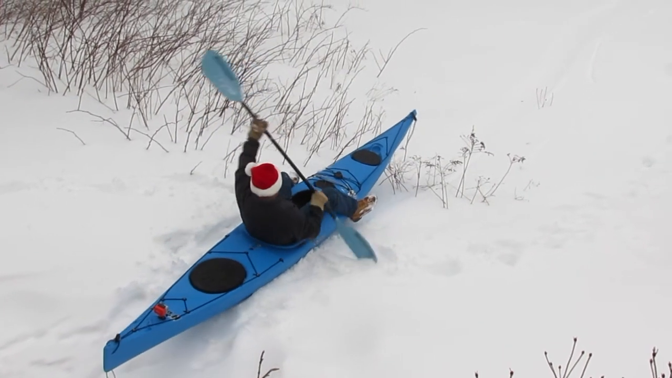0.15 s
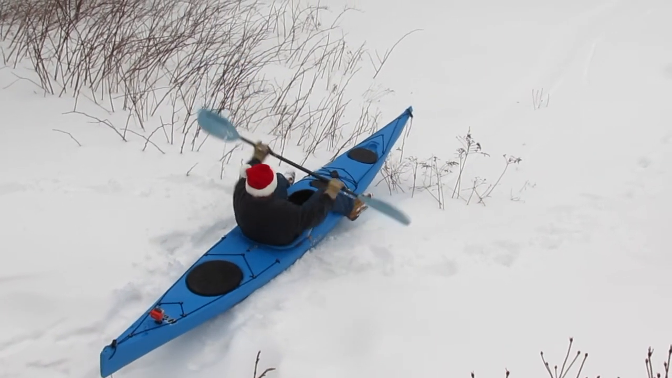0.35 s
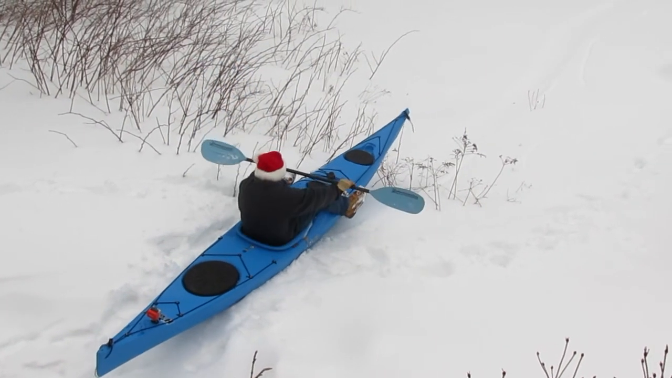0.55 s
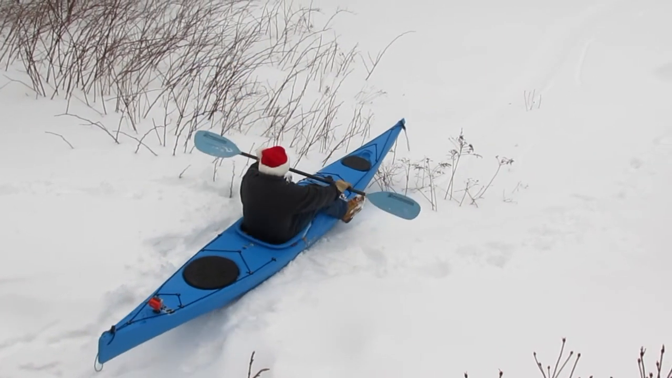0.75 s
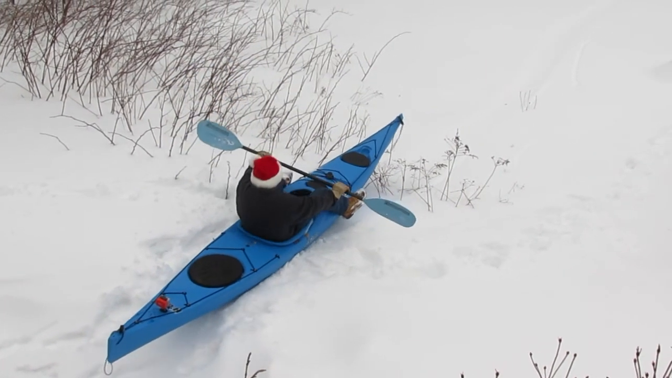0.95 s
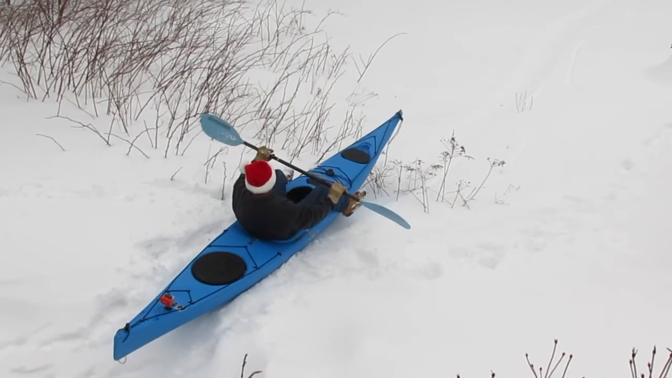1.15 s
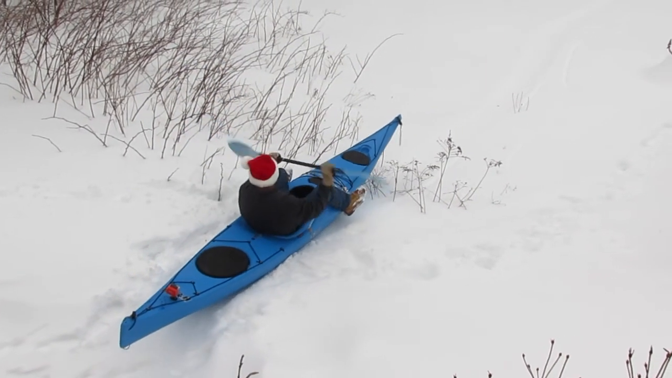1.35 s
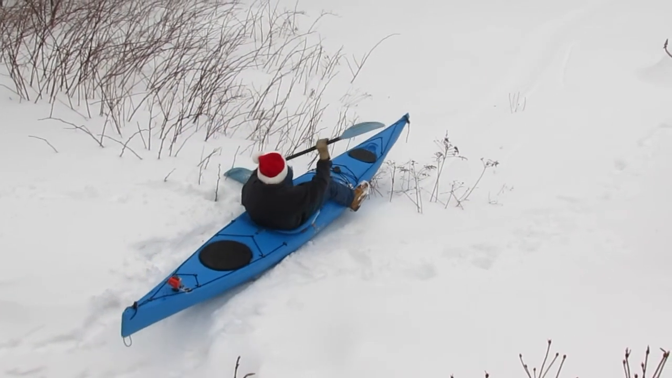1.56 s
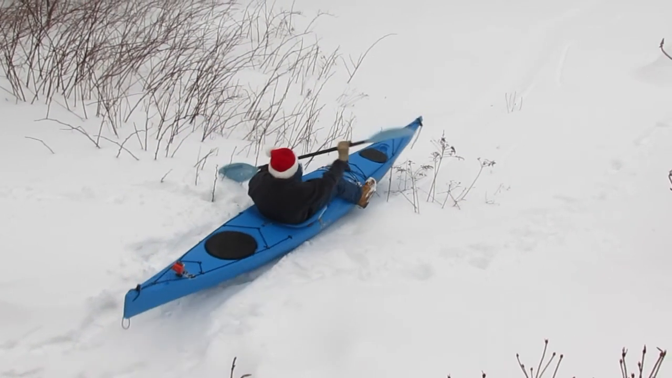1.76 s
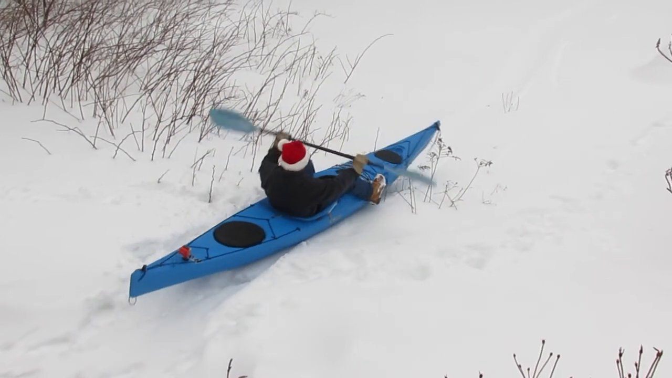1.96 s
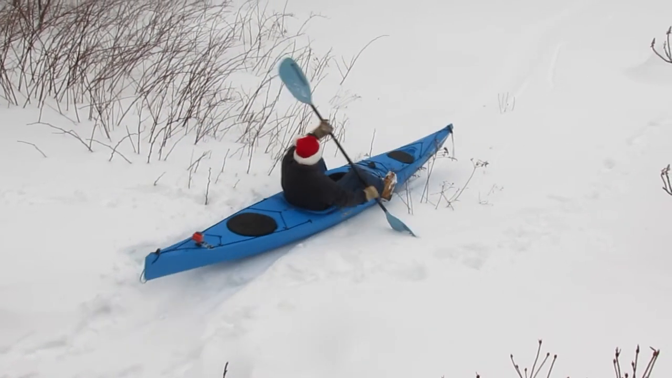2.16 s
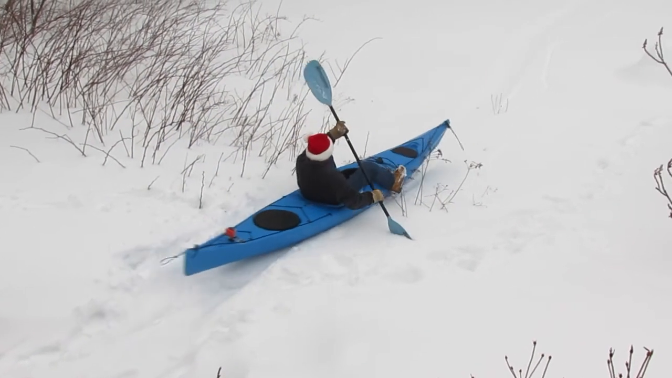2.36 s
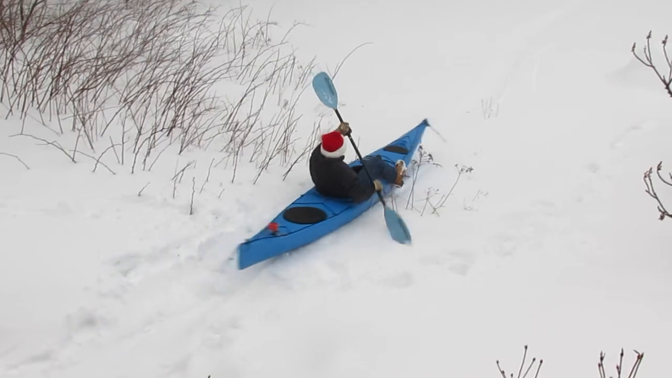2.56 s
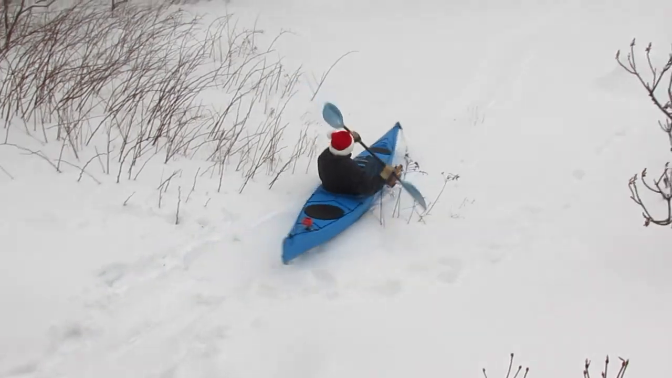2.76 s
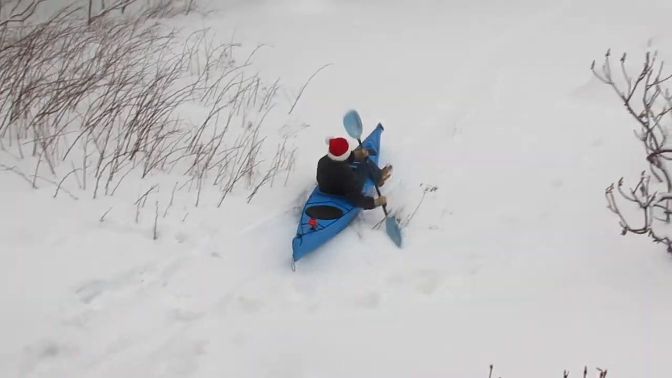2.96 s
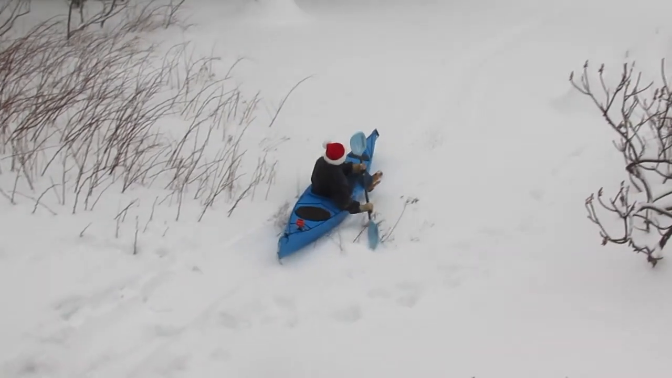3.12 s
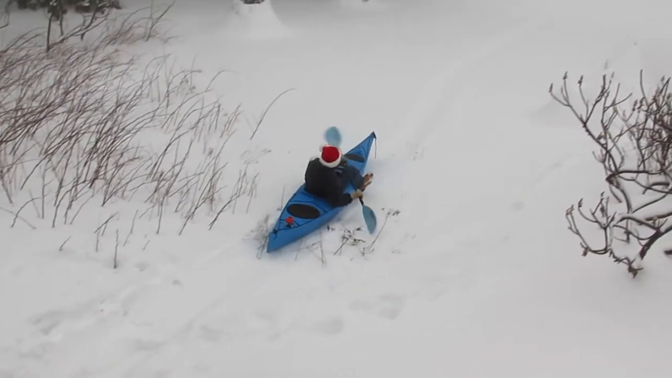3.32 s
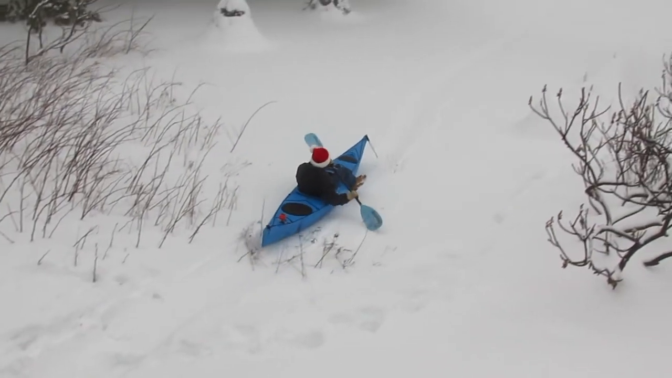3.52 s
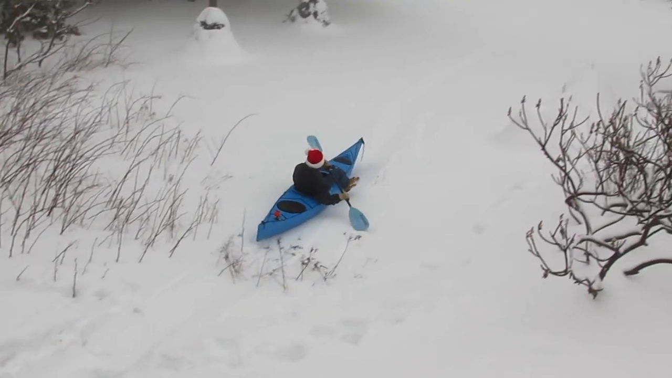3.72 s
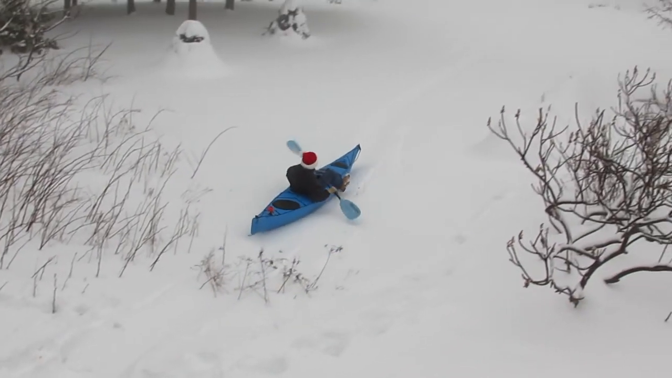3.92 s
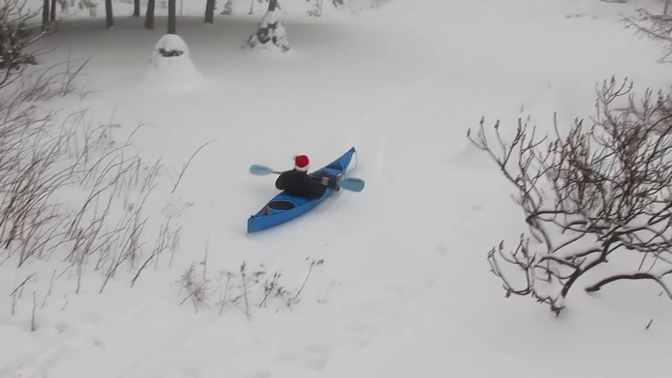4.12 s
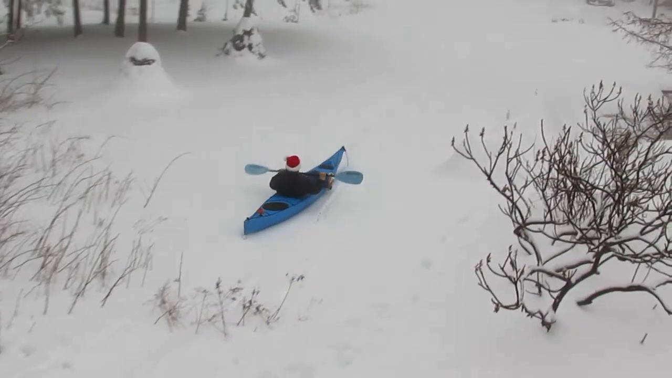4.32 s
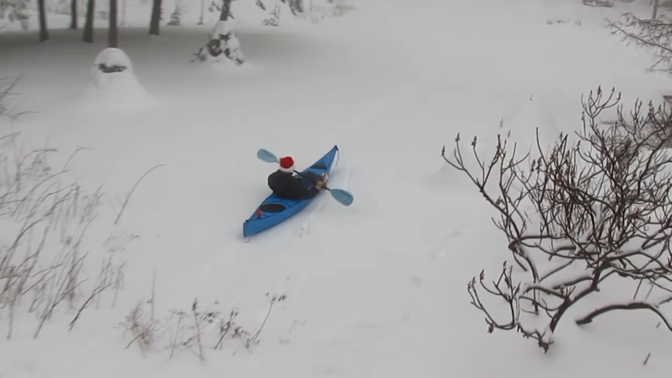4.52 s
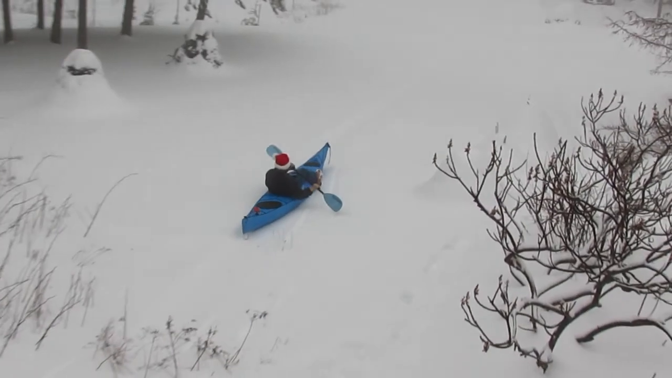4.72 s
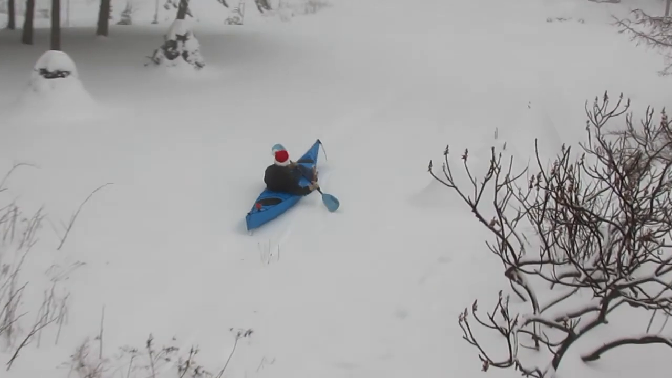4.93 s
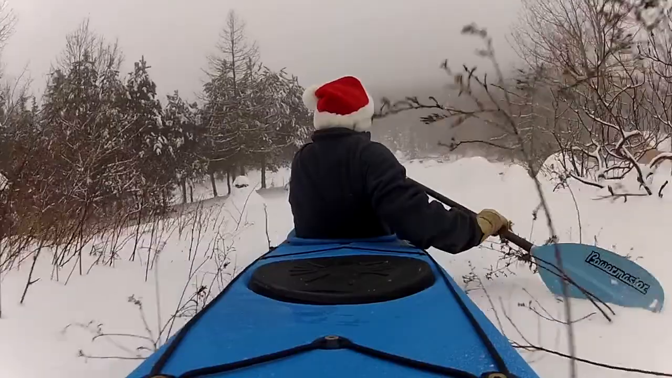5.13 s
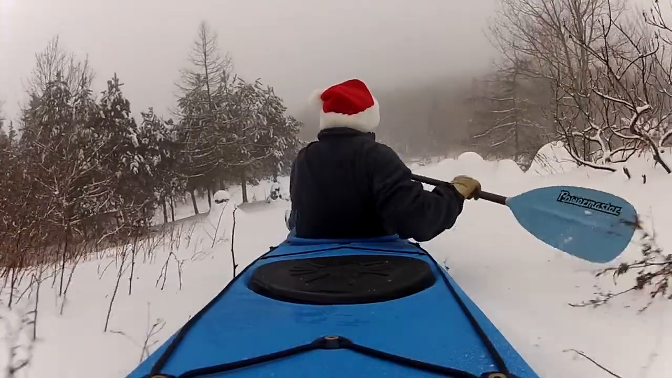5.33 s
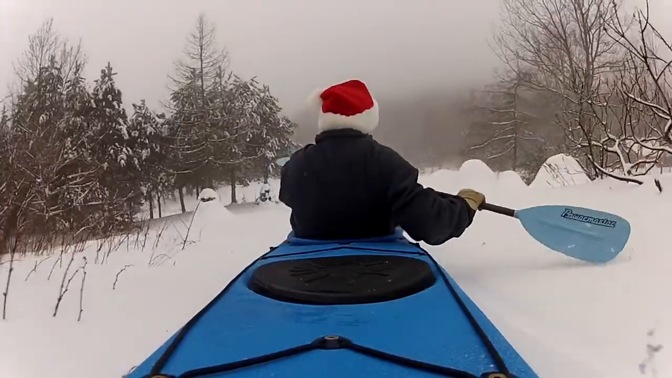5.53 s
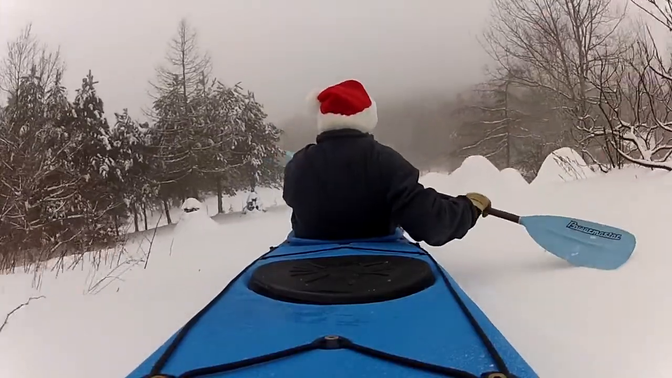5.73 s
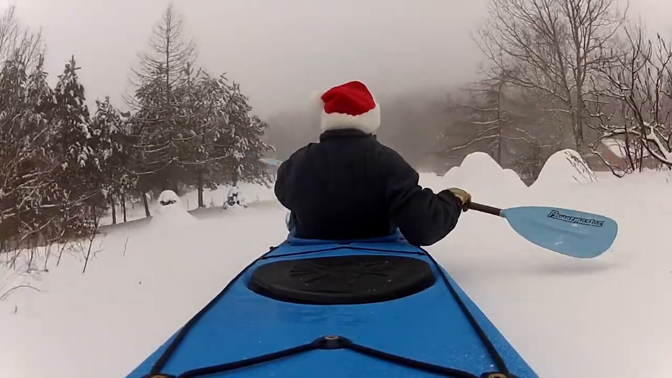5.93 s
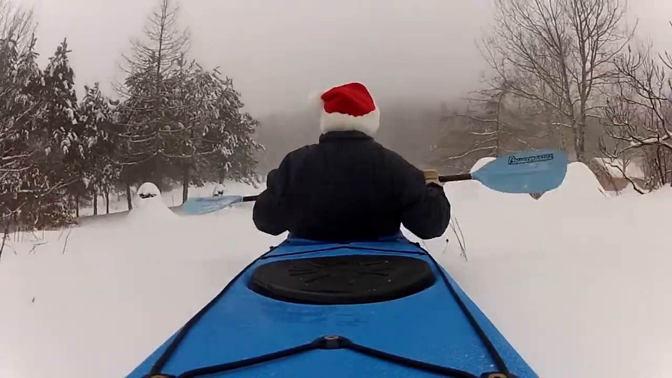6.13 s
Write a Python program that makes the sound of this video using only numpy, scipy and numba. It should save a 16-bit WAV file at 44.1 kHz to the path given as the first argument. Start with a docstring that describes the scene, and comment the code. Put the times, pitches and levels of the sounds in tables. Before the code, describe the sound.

A paddle crunches into crusty snow as a kayak bumps and hisses downhill in gusty wind, switching to close, resonant hull rubbing.

```python
"""A snowy slope, heard from a hand-held camera uphill: a plastic kayak is pushed off and slides down.
The hull hisses over snow crystals and thumps on bumps, the paddle blade crunches and drags in the crust,
gusts buffet the microphone. Then the sound cuts to a small camera fixed on the deck, where the
rubbing rings hull and housing."""
import sys
import numpy as np
from scipy import signal
from scipy.fft import rfft, irfft
from scipy.io import wavfile
from scipy.ndimage import uniform_filter1d
from numba import njit

SR = 44100
rng = np.random.default_rng(int(sys.argv[2]) if len(sys.argv) > 2 else 0)


def master_out(mix):
    """Clip the mix to full scale and print it as 16-bit PCM to the path in sys.argv[1]."""
    frames = np.transpose(np.atleast_2d(mix))
    ceiling = np.clip(frames, -1, 1)
    pcm = np.round(ceiling * 32767).astype(np.int16)
    wavfile.write(sys.argv[1], SR, pcm)


N = 272538
T = np.arange(N) / SR


def undb(db):
    return 10 ** (np.asarray(db) / 20)


def unit(x):
    return x / np.sqrt(np.mean(x ** 2))


def columns(table):
    """Each column after time, interpolated per sample."""
    times_s, *cols = np.transpose(table)
    return [np.interp(T, times_s, col) for col in cols]


def colour(x, points, db_scale=1):
    """Zero-phase filter through (frequency [Hz], gain [dB]) points."""
    hz, db = np.transpose(points)
    bins_hz = np.arange(N // 2 + 1) * SR / N + 1
    gain_db = db_scale * np.interp(np.log(bins_hz), np.log(hz), db)
    return irfft(rfft(x) * undb(gain_db), N)


@njit
def svf(x, hz, width_hz):
    """State-variable band-pass, unity gain at its moving centre."""
    y = np.empty(len(x))
    band_state, low_state = 0., 0.
    for i in range(len(x)):
        g = np.tan(np.pi * hz[i] / SR)
        damping = width_hz[i] / hz[i]
        v = (band_state + g * (x[i] - low_state)) / (1 + g * (g + damping))
        band_state = 2 * v - band_state
        low_state += 2 * g * v
        y[i] = damping * v
    return y


def band(x, hz, *widths_hz):
    """Band-passes in series, one per width."""
    for width_hz in widths_hz:
        x = svf(x, hz + np.zeros(N), width_hz + np.zeros(N))
    return x


def walk(rate_hz):
    """Random steps, smoothed twice; RMS 1."""
    hold = max(int(SR / rate_hz), 1)
    steps = np.repeat(rng.standard_normal(N // hold + 1), hold)
    return unit(uniform_filter1d(uniform_filter1d(steps, hold), hold)[:N])


def grains(rate_hz, spread_db):
    """Snow crystals breaking: noise whose level jumps in short bursts."""
    return unit(rng.standard_normal(N) * undb(spread_db * walk(rate_hz)))


def ring(x, modes):
    """Damped modes: (frequency [Hz], level [dB], t60 [s])."""
    return sum(undb(db) * unit(band(x, hz, np.log(1000) / np.pi / t60_s)) for hz, db, t60_s in modes)


def stroke_power(start_s, db, rise_s, hold_s, t60_s):
    """Power envelope of one stroke: rise, hold, decay."""
    t = T - start_s
    decay_db = 60 * np.maximum(t - rise_s - hold_s, 0) / t60_s
    return (undb(db - decay_db) * np.clip(t / rise_s, 0, 1)) ** 2


def air():
    """Still air: faint, steady, mostly low noise."""
    # (frequency [Hz], gain [dB])
    spectrum = [(15, -40), (25, -6), (249, 3), (384, -4.5), (677, -8), (2990, -18), (9840, -24),
                (13200, -26), (16000, -31)]
    return unit(colour(rng.standard_normal(N), spectrum)) * undb(-50)


def wind(level_db):
    """Gusts buffeting the microphone ports."""
    buffet = unit(band(rng.standard_normal(N), 64, 31, 60))
    return buffet * undb(level_db + 2.7 * walk(8))


def hull_and_wind():
    """Each bump is a blow, then a rough shove; the riding hull shakes under the gusts."""
    # drops onto bumps: (time [s], relative level [dB])
    bumps = [(0.815, -21.5), (0.848, -21.5), (0.889, -23.5), (1.437, -23), (1.459, -22.5), (1.592, -28),
             (1.703, -22.5), (1.798, -22.5), (1.881, -25), (2.084, -19)]
    # hull modes: (frequency [Hz], relative level [dB], t60 [s])
    modes = [(61, -1.5, 0.1), (92.4, -0.5, 0.13), (192, -6, 0.065), (320, -8, 0.025)]
    # (time [s], hull shake [dB], wind [dB])
    rumble = [(.3, -44.5, -57.5), (.6, -59.5, -58), (1.0, -44, -70), (1.65, -40, -58), (2.3, -42.5, -39),
              (2.95, -37.5, -47), (3.7, -49, -51), (4.1, -46.5, -41), (4.6, -48, -44), (5.2, -43, -63)]
    shake_db, wind_db = columns(rumble)
    force = 0
    for start_s, db in bumps:
        t = np.maximum(T - start_s, 0)
        blow = t / 0.0029 * np.exp(-t / 0.0017)
        shove = 0.16 * np.exp(-t / 0.024) * walk(600)
        force += undb(db) * (T >= start_s) * (blow + shove)
    thumps = unit(ring(force, modes)) * undb(-42.5)
    shake = unit(ring(rng.standard_normal(N), [(hz, db, .06) for hz, db, _ in modes[1:]]))
    return thumps + shake * undb(shake_db + walk(12)) + wind(wind_db)


def shaft_taps():
    """The paddle shaft taps the deck and rings."""
    # (time [s], relative level [dB])
    taps = [(0.595, -32.5), (0.7791, -42)]
    # shaft modes: (frequency [Hz], relative level [dB], t60 [s])
    modes = [(1280, -1, 0.03), (1780, -6, .015), (2180, 2, 0.044), (2480, -2, .012), (3150, -5, .012)]
    blow_t60_s, peak_db = 0.052, -32
    blows = sum(undb(db - 60 * np.abs(T - s) / blow_t60_s) * (T >= s) for s, db in taps)
    ringing = ring(blows * rng.standard_normal(N), modes)
    return ringing * undb(peak_db) / np.abs(ringing).max()


def snap_power():
    """Power envelope of crust lumps snapping: faint ones at random, loud ones at set times."""
    # (time [s], level [dB])
    loud_snaps = [(0.0717, -33), (0.3588, -29), (0.3974, -40), (0.4422, -31), (0.508, -42), (0.5664, -38),
                  (0.614, -40), (0.669, -43), (0.7108, -43), (1.6464, -21), (1.6604, -23), (1.758, -18),
                  (1.777, -21), (1.7946, -22), (1.923, -18)]
    faint_count, t60_s = 140, 0.0096
    onsets = np.zeros(N)
    faint_db = rng.normal(-45.5, 5, faint_count)
    onsets[rng.integers(N, size=faint_count)] = undb(2 * faint_db)
    for start_s, db in loud_snaps:
        onsets[int(start_s * SR)] = undb(2 * db)
    return signal.lfilter([1], [1, -undb(-120 / t60_s / SR)], onsets)


def blade():
    """The blade bites and drags in snapping crust; bites also excite its broad ring."""
    # (time [s], level [dB], hold [s], t60 [s], knock re level [dB])
    bites = [(0, -36.5, .008, .06, -5), (0.201, -30, .003, .03, -5), (0.213, -23.5, .005, .03, -9),
             (0.233, -23, .003, .025, -5), (.256, -24.5, 0.0027, .035, -1.5), (0.278, -37, .003, .03, -7),
             (0.31, -36, .003, .035, -11), (1.581, -19, 0.054, .045, -6), (1.617, -22, 0.0054, .02, -9),
             (1.668, -26.5, .005, .03, -16), (1.828, -25, .004, 0.063, -2.5),
             (2.215, -13, 0.0083, 0.11, -9), (2.626, -24, 0.018, .2, -3), (2.974, -20.5, 0.067, .06, -9),
             (3.274, -21, .005, .03, -12), (3.475, -14.5, 0.027, 0.18, -16), (5.079, -20, 0.04, .35, -9.5)]
    # (time [s], level [dB], rise [s], hold [s], dull part re level [dB])
    drags = [(0.094, -37, .11, .05, 5.5), (1.874, -32.5, .006, .015, 5), (2.26, -36, .04, 0.19, -10),
             (3.08, -21.5, 0.15, .135, 0.5), (3.521, -28, .006, .09, 3.5), (3.681, -24, 0.0066, 0.24, 1)]
    # breaking crust: (frequency [Hz], gain [dB])
    spectrum = [(120, -23), (250, -17), (450, -18), (800, -8.5), (1250, -6), (2300, -9.5), (4500, -5.5),
                (12000, -9.5), (16000, -21.5)]
    split_hz, knock_hz, knock_width_hz = 8600, 1650, 2280
    bright_power = snap_power()
    dull_power = 0.23 * bright_power
    knock_power = 0
    for start_s, db, hold_s, t60_s, knock_db in bites:
        power = stroke_power(start_s, db, rise_s=.002, hold_s=hold_s, t60_s=t60_s)
        bright_power += power
        dull_power += power
        knock_power += power * undb(2 * knock_db)
    for start_s, db, rise_s, hold_s, dull_db in drags:
        power = stroke_power(start_s, db, rise_s, hold_s, t60_s=0.058)
        bright_power += power
        dull_power += power * undb(2 * dull_db)
    crust = unit(colour(grains(700, 2.65) * undb(0.95 * walk(110)), spectrum))
    dull = signal.sosfiltfilt(signal.butter(2, split_hz, fs=SR, output="sos"), crust)
    bright = crust - dull
    knock = unit(band(crust, knock_hz, knock_width_hz, knock_width_hz))
    return dull * np.sqrt(dull_power) + bright * np.sqrt(bright_power) + knock * np.sqrt(knock_power)


def slide():
    """Crystals rub under the hull; the slope's reflection leaves two humps that drift with distance."""
    # paddle swishing through snow, then push-off, gathering speed: (time [s], low hump [dB])
    levels = [(0, -50.5), (.2, -37), (.4, -49.5), (.7, -70), (.79, -53), (.88, -38.5), (.99, -36.5),
              (1.36, -44.5), (1.46, -38.5), (1.67, -40), (1.83, -32.5), (1.9, -34), (2.15, -28.5),
              (2.27, -28.5), (2.36, -24), (2.56, -20), (2.71, -22), (2.94, -21), (3.13, -24), (3.47, -25),
              (3.63, -29.5), (3.7, -24), (3.92, -25.5), (4.03, -23), (4.29, -23), (5.23, -24.5)]
    # spectral humps as the boat turns and draws away:
    # (time [s], low centre [Hz], high re low [dB], high centre [Hz], body re low [dB])
    humps = [(0, 1590, -2.5, 5660, -4), (.8, 1250, -4, 6100, 0), (1.05, 1350, -2.5, 5500, 1),
             (1.36, 1370, 2, 5500, 3), (1.75, 1240, -2.5, 5700, 1), (2.12, 1330, 1.5, 6560, -5),
             (2.4, 1450, -1.5, 6200, -20), (2.95, 1650, 1.5, 5300, -5), (3.5, 1820, 3, 5730, -7),
             (4.1, 1860, 2.5, 5750, -8), (4.75, 2020, 5, 5710, -10), (5.23, 2000, 1, 5700, -8)]
    # packed snow: (frequency [Hz], gain [dB])
    body_spectrum = [(200, -13), (400, -8), (700, 0), (1200, -3), (2500, -8), (4000, -10.5), (7500, -6),
                     (10500, -22), (15000, -58)]
    # fine powder, lost with distance: (time [s], level re low hump [dB])
    spray_levels = [(.8, -10.5), (1.5, -6), (2.3, -10.5), (3.2, -16), (4, -37), (5.2, -34)]
    low_db, = columns(levels)
    spray_db, = columns(spray_levels)
    low_hz, high_db, high_hz, body_db = columns(humps)
    low = unit(band(grains(400, 0.79), low_hz, 0.72 * low_hz, 2.5 * low_hz))
    high = unit(band(grains(400, 0.52), high_hz, 0.58 * high_hz, 0.64 * high_hz)) * undb(high_db)
    body = unit(colour(grains(300, 0.77), body_spectrum)) * undb(body_db)
    spray = unit(band(grains(450, 2.0), 8300, 5200)) * undb(spray_db)
    low *= undb(.5 * walk(30.93))  # uneven snow
    high *= undb(.5 * walk(20))
    return undb(low_db) * (low + high + body + spray)


def slope_sources():
    """Kayak, paddle and gusts; fresh noise on each call."""
    return slide() + blade() + shaft_taps() + hull_and_wind()


def handheld():
    """Two close ports share the direct sound; scatter off snow and bushes arrives in opposite phase."""
    # scattered re direct: (frequency [Hz], gain [dB])
    scatter = [(60, -17), (400, -9.5), (1400, -13.5), (3000, -7.5), (6500, -18), (15000, -6)]
    # port imbalance: (frequency [Hz], left minus right [dB])
    ports = [(60, -7), (250, -3.5), (700, -2.5), (1500, -.5), (4500, .5), (9000, -.5), (15000, -2.5)]
    # response: (frequency [Hz], gain [dB])
    microphone = [(20, -24), (45, -16.5), (90, -3.5), (150, 1), (2500, 0.5), (3000, -2.5), (3900, 1),
                  (5000, -0.5)]
    direct = slope_sources()
    scattered = colour(slope_sources(), scatter)
    sides = []
    for sign in (1, -1):
        at_port = colour(direct + sign * scattered + air(), ports, db_scale=sign / 2)
        sides.append(colour(at_port, microphone))
    return np.tanh(0.79 * np.array(sides)) / 0.8  # soft clip


def deck():
    """Rubbing carried through the plastic rings deck and housing; mono, sampled at 12 kHz."""
    # (time [s], rubbing [dB])
    rub_levels = [(5.24, -18), (5.42, -14.5), (5.486, -17.5), (5.53, -13.5), (5.75, -17.5), (5.95, -14.5),
                  (5.982, -16), (6.012, -14.5), (6.18, -15.5)]
    # (time [s], hum [dB], thudding [dB])
    low_levels = [(5.24, -37, -32), (5.32, -34, -33.5), (5.4, -37, -28), (5.47, -41, -34), (5.54, -35, -23),
                  (5.7, -28, -35), (5.78, -30.5, -29), (5.88, -28, -36.5), (5.95, -34, -38),
                  (6.01, -27, -34.5), (6.12, -39, -35), (6.18, -34, -28)]
    # housing and deck resonances: (frequency [Hz], width [Hz], gain [dB])
    modes = [(434, 94, -13.5), (648, 15, -10), (1063, 150, -1), (1584, 150, -4), (1886, 326, -0.5),
             (2390, 198, 1), (2790, 210, -3), (3620, 220, -7.5), (3975, 174, -8), (4500, 150, -32),
             (4840, 470, -22)]
    # (frequency [Hz], width [Hz], relative level [dB])
    thud_bands = [(119, 19, -0.5), (164, 26, -2), (232, 19, -4.5)]
    # (frequency [Hz], gain [dB])
    treble_shape = [(3050, 2.5), (3300, -7), (3500, 2.5), (3900, -2), (4300, -8.5), (5500, -1.5),
                    (6000, -12)]
    rub_db, = columns(rub_levels)
    hum_db, thud_db = columns(low_levels)
    rub = grains(250, 0.72)
    ringing = sum((-1) ** k * undb(db) * band(rub, hz, width_hz)
                  for k, (hz, width_hz, db) in enumerate(modes))
    ringing = unit(colour(ringing, treble_shape))
    hum_hz = 48.7 + 6.4 * walk(25)  # the deck's lowest flexing
    hum = unit(np.sin(2 * np.pi * np.cumsum(hum_hz) / SR))
    thud = sum(undb(db) * unit(band(rng.standard_normal(N), hz, width_hz))
               for hz, width_hz, db in thud_bands)
    thud = unit(colour(thud, [(300, -2.5), (600, 5)]))
    sound = ringing * undb(rub_db) + hum * undb(hum_db) + thud * undb(thud_db)
    held_48k = np.repeat(signal.resample_poly(sound, 40, 147), 4)  # the hold adds treble images
    stepped = signal.resample_poly(held_48k, 147, 160)[:N]
    top_hz = 15150
    return signal.sosfilt(signal.ellip(12, .3, 80, top_hz, fs=SR, output="sos"), stepped)


def scene():
    """Slope, then a cut to the deck."""
    cut_s, fade_s = 5.229, 0.001
    fade = np.clip((T - cut_s) / fade_s, 0, 1)
    return handheld() * (1 - fade) + deck() * fade


def record(dry):
    """Steep low-pass."""
    top_hz = 15720
    return signal.sosfilt(signal.ellip(12, .3, 70, top_hz, fs=SR, output="sos"), dry)


dry = scene()
out = record(dry)
master_out(out)
```